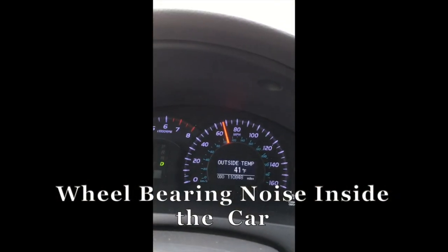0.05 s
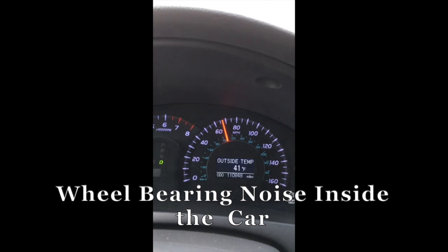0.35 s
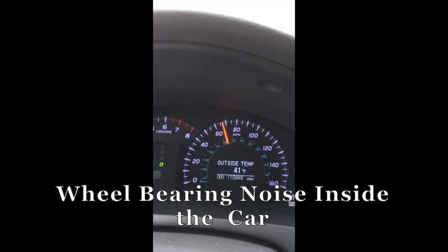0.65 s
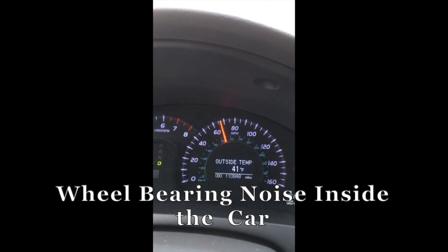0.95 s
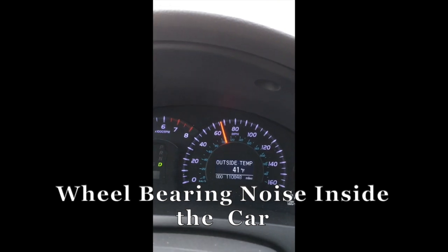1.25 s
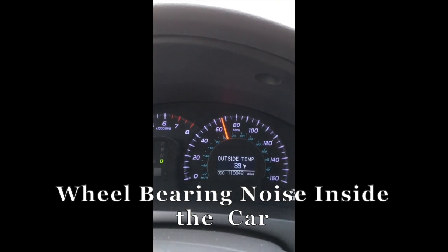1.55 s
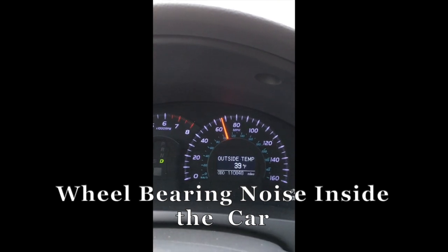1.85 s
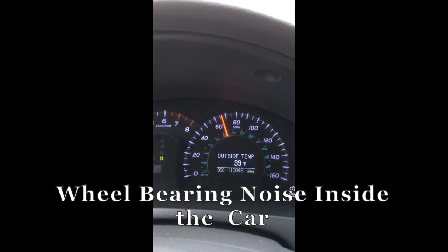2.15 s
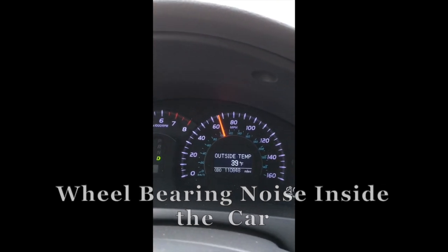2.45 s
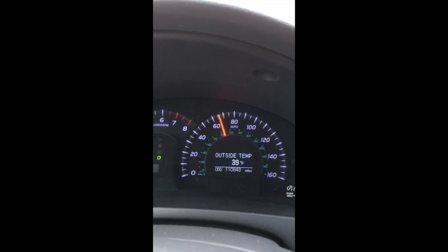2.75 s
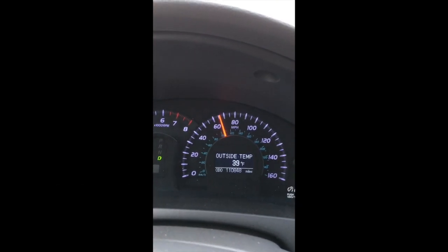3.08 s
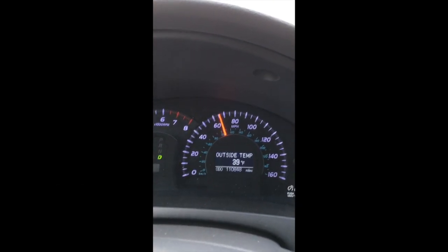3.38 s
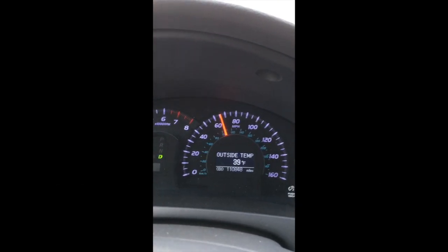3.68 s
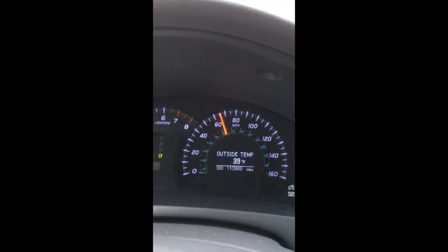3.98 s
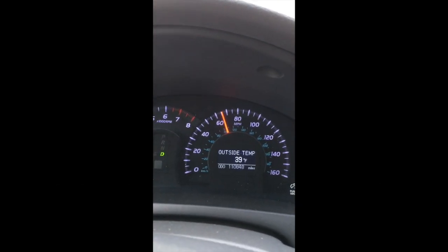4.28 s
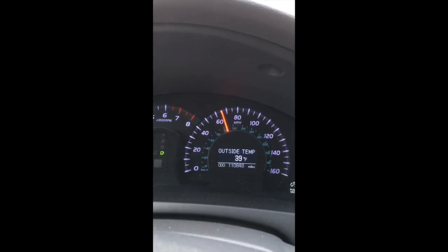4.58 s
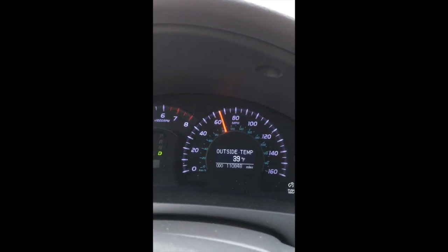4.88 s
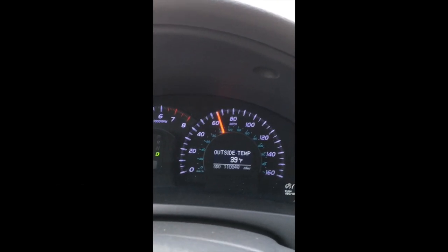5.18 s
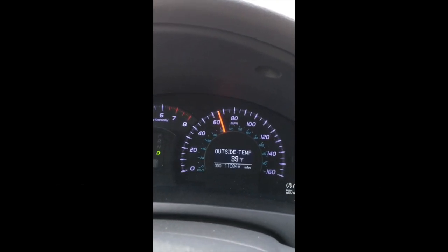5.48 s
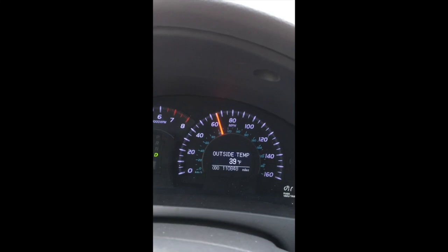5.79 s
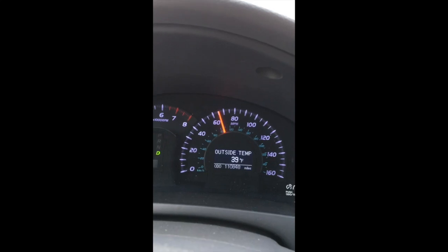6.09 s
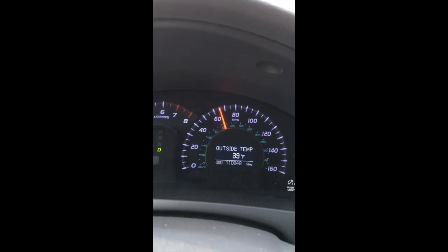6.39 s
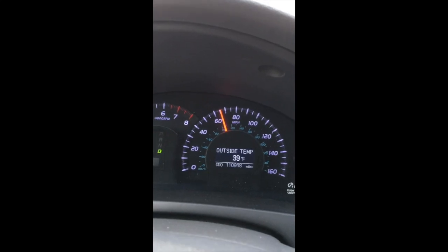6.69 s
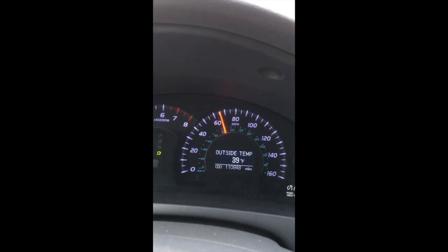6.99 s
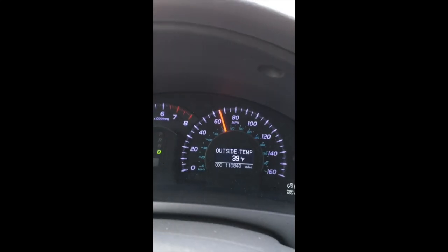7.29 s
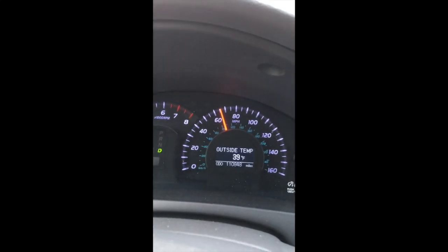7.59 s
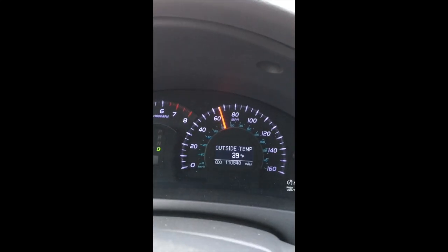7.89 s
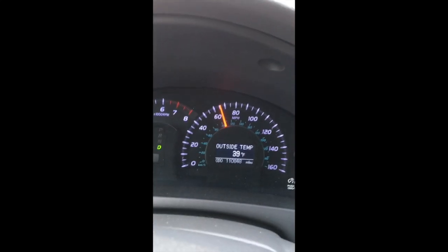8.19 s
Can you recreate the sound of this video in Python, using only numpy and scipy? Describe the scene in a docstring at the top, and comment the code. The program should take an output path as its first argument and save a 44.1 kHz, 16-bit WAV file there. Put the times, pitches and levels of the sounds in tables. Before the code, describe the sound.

A worn wheel bearing drones inside a fast-moving car over road rumble and tyre roar, with spells of buzzing dashboard trim.

```python
"""Highway drive on a worn wheel bearing

Inside the car, the wheels drone on multiples of their turning rate; the pitted bearing and the engine beat
against that drone and its deep boom. The road rumbles and roars through the body, swelling on bumps. Loose
dashboard trim buzzes in spells, once per wheel turn, with knocks, snaps and shivers; small bright ticks sound
now and then."""
import sys
import numpy as np
from scipy import signal
from scipy.fft import rfft, irfft, next_fast_len
from scipy.io import wavfile
from scipy.ndimage import uniform_filter1d

SR = 44100
rng = np.random.default_rng(int(sys.argv[2]) if len(sys.argv) > 2 else 0)


def inscribe(sig):
    """Save sig as 16-bit PCM at rate SR to the path in sys.argv[1].

    A 1-D sig is mono; a 2-D sig holds one channel per row.
    Samples are clipped to [-1, 1] before scaling.
    """
    pcm = np.round(np.clip(np.atleast_2d(sig).T, -1, 1) * 32767)
    wavfile.write(sys.argv[1], SR, pcm.astype(np.int16))


N = 372424

BALL_PASSES_PER_TURN = 8.13
# The ring of the loose trim. Each row: pitch in Hz, width in Hz, level in dB.
TRIM_RING = [(900, 57, 9), (1370, 150, -2), (2295, 440, 17), (3020, 410, -0.5), (4000, 190, 2),
             (4760, 420, 0), (5280, 360, 2), (6130, 540, 2.5), (6550, 330, 1), (7050, 800, -1),
             (8240, 400, -5), (9900, 400, -9), (12500, 4000, -18.5)]


def from_db(db):
    """Decibels to gain."""
    return 10 ** (np.asarray(db) / 20)


def rms_one(x):
    """Scale to unit rms."""
    return x / np.sqrt(np.mean(x ** 2) + 1e-20)


def in_time(rows):
    """A curve through (seconds, value) points, at every sample."""
    return np.interp(np.arange(N) / SR, *np.transpose(rows))


def drift(rate_hz):
    """Smooth random wandering with a spread of 1."""
    step = 40  # samples between control points
    pole = np.exp(-2 * np.pi * rate_hz * step / SR)
    white = rng.standard_normal(N // step + 2002)
    slow = signal.lfilter([1], [1, -2 * pole, pole * pole], white)[2000:]
    return np.interp(np.arange(N) / step, np.arange(len(slow)), rms_one(slow))


def swell(crest_s, length_s):
    """A smooth rise and fall of height 1."""
    return np.cos(np.pi * np.clip((np.arange(N) / SR - crest_s) / length_s, -.5, .5)) ** 2


def tone(cycles):
    """A sine of rms 1 that follows a running count of cycles."""
    return np.sqrt(2) * np.sin(2 * np.pi * (cycles + rng.random()))


def noise(spectrum):
    """Noise of rms 1, coloured by (Hz, dB) points and falling away beyond them."""
    size = next_fast_len(N)
    hz, db = np.transpose(spectrum)
    bins_hz = np.maximum(np.arange(size // 2 + 1) * SR / size, 1)
    skirts = np.minimum(1, np.minimum(bins_hz / hz[0], hz[-1] / bins_hz)) ** 4
    gain = from_db(np.interp(np.log(bins_hz), np.log(hz), db)) * skirts
    return rms_one(irfft(rfft(rng.standard_normal(size)) * gain, size)[:N])


def evened(x, window_s):
    """Take the chance swells out of a noise."""
    return x / np.sqrt(uniform_filter1d(x ** 2, int(window_s * SR)))


def resonate(x, modes):
    """Parallel resonances with alternating signs."""
    out = 0
    for k, (hz, width, db) in enumerate(modes):
        radius = np.exp(-np.pi * width / SR)
        poles = [1, -2 * radius * np.cos(2 * np.pi * hz / SR), radius ** 2]
        gain = (-1) ** k * from_db(db) * (1 - radius ** 2) / 2
        out = out + gain * signal.lfilter([1, 0, -1], poles, x + 1e-18)
    return out


def cabin(x, echo_db):
    """Glass and dashboard return a few early reflections that ripple the spectrum."""
    out = x.copy()
    for delay_s, sign in zip(rng.uniform(.0011, .016, size=8), rng.choice([-1, 1], size=8)):
        lag = int(delay_s * SR)
        out[lag:] += sign * from_db(echo_db) * x[:-lag]
    return out


def wheel_drone(speed, turns, waver_db, slip_turns):
    """The same unevenness comes round on every turn; changing load makes each partial waver."""
    # The worn wheel's partials. Each row: multiple of the turning rate, level in dB.
    partials = [(3, -40.1), (9, -32.6), (10, -47.1), (14, -48.1), (15, -40.5), (16, -40.4), (17, -39.8),
                (19, -55.9), (22, -58.9), (23, -47.9), (25, -44.5), (26, -53.5), (30, -59.4), (31, -53.9),
                (33, -49.7), (38, -61.4), (39, -51.9), (41, -65.7), (45, -62.8), (46, -60.9), (47, -57.4),
                (48, -62.9), (49, -55.7), (65, -64.6), (71, -62.0)]
    # Partials that swell or fade with speed. Each row: multiple, dB gained per extra turn a second.
    slopes = [(15, 11), (17, -15), (23, -8), (33, -6), (39, -7), (47, -38), (49, -20)]
    slope_of, faster = dict(slopes), speed - speed.mean()
    slipped = turns + slip_turns * drift(2.8)
    return sum(from_db(db + slope_of.get(k, 0) * faster + waver_db * drift(2)) * tone(k * slipped)
               for k, db in partials)


def pitted_bearing(turns, waver_db, slip_turns):
    """Balls roll over a pit that turns through the loaded zone, making sidebands one turn apart."""
    # The pit's tones. Each row: multiple of the ball-pass rate, offset in cycles per turn, level in dB.
    pit_tones = [(2, 0, -50.9), (2, 1, -43.5), (3, -1, -54.7), (3, 1, -59.7), (4, 1, -62.4), (5, -1, -60.1),
                 (5, 0, -64.9), (5, 1, -59.9), (5, 2, -66.5), (6, -1, -61.4), (6, 1, -66.4)]
    passes = BALL_PASSES_PER_TURN * (turns + slip_turns * drift(.84))
    return sum(from_db(db + waver_db * drift(3.9)) * tone(k * passes + side * turns)
               for k, side, db in pit_tones)


def bearing_growl(turns, top_db, fall_db_per_octave):
    """Pairs of sidebands around higher multiples of the ball-pass rate, weaker by the octave."""
    growl = 0
    for k in range(7, 18):
        db = top_db - fall_db_per_octave * np.log2(k / 7)
        for side in (-1, 1):
            growl += from_db(db + 1.5 * drift(2)) * tone((k * BALL_PASSES_PER_TURN + side) * turns)
    return growl


def deep_boom(speed, turns, top_db, waver_db):
    """Seven cycles per wheel turn, strongest at one road speed and following the speed a little late."""
    peak_speed, width, lag_s = 14.125, .06, .25  # turns a second; 1 dB weaker a width away
    earlier_speed = np.interp(np.arange(N) - lag_s * SR, np.arange(N), speed)
    db = top_db - ((earlier_speed - peak_speed) / width) ** 2
    return from_db(db - waver_db * drift(2.2)) * tone(7 * turns)


def engine(turns, firings_per_turn):
    """The firings drone just above the boom and beat with it where the two overlap."""
    # It comes through as the car slows and picks up. Each row: time in seconds, level in dB.
    fader = [(0, -56), (2.4, -47.5), (3.3, -32.5), (5.5, -29.5), (6.4, -37.5), (8.44, -47)]
    return from_db(in_time(fader)) * tone(firings_per_turn * turns)


def body_rumble(shake_db, thud_db, tremble_db, panel_db, panel_follow):
    """Each bump swells the steady chassis shake and cabin thud; the panels follow in part."""
    # The bigger bumps. Each row: crest in seconds, length in seconds, shake in dB, thud in dB.
    bumps = [(0.01, .2, -37, -24), (0.803, 0.2, -40, -20.5), (1.738, 0.27, -29, -29),
             (1.868, 0.13, -32, -22), (2.37, .4, -32, -27.5), (3.025, 0.32, -26, -21.5),
             (3.258, 0.36, -37, -22.5), (3.877, 0.41, -43, -21), (4.548, 0.66, -38, -26),
             (5.01, 0.2, -29, -17), (5.375, 0.17, -27, -28), (5.676, 0.37, -35, -18.5),
             (6.157, 0.15, -36, -19), (7.182, 0.18, -28, -22.5), (7.651, 0.16, -21, -18.5),
             (8.082, 0.39, -34, -21)]
    # Colours of chassis, cabin and panels. Each row: frequency in Hz, relative level in dB.
    shake_colour = [(20, -22), (28, -9), (42, 0), (52, -1), (62, -12)]
    thud_colour = [(48, -14), (58, -2), (68, 0), (83, 0), (98, -7), (118, -14)]
    panel_colour = [(100, -7), (118, -1), (145, -1), (175, 0), (203, -7), (240, -13), (275, -12),
                    (400, -32)]
    shake_gain, thud_gain = from_db(shake_db), from_db(thud_db + tremble_db * drift(4))
    for crest_s, length_s, bump_shake_db, bump_thud_db in bumps:
        push = swell(crest_s, length_s)
        shake_gain = np.hypot(shake_gain, from_db(bump_shake_db) * push)
        thud_gain = np.hypot(thud_gain, from_db(bump_thud_db) * push)
    shake = shake_gain * evened(noise(shake_colour), window_s=.11)
    thud = thud_gain * evened(noise(thud_colour), window_s=.099)
    panel_gain = from_db(panel_db) * (thud_gain / thud_gain.mean()) ** panel_follow
    return shake + thud + panel_gain * noise(panel_colour)


def tyre_roar(turns, roar_db, ring_db, throb_db):
    """The tyres roar on the road, ring the panels and throb twice per turn."""
    # The changing road surface. Each row: time in seconds, level in dB.
    surface = [(0, -42.5), (.7, -44.5), (2.5, -42), (5, -43), (8.44, -44)]
    # The roar's colour. Each row: frequency in Hz, relative level in dB.
    colour = [(170, -64), (300, -59.5), (390, -59), (500, -62.5), (590, -58), (670, -60.5), (740, -64.5),
              (850, -59.5), (1020, -60.5), (1150, -64.5), (1800, -70), (2900, -76.5), (3700, -85),
              (5000, -108)]
    # The ring of panels and glass. Each row: pitch in Hz, width in Hz, level in dB.
    panel_ring = [(680, 18, 4), (845, 45, 0), (990, 18, 0), (1037, 18, 4), (1355, 40, -3), (1470, 80, -8),
                  (1615, 30, -5), (1900, 40, -8), (2250, 35, -11), (2560, 60, -12), (3050, 100, -18),
                  (3250, 50, -18)]
    ringing = from_db(ring_db) * rms_one(resonate(rng.standard_normal(N), panel_ring))
    gain = from_db(in_time(surface) + throb_db * tone(2 * turns))
    return gain * (from_db(roar_db) * noise(colour) + ringing)


def air_hiss(level_db, waver_db):
    """Air hisses faintly, wavering a little."""
    # The hiss's colour. Each row: frequency in Hz, relative level in dB.
    colour = [(2500, -5.5), (4300, 3.5), (4900, -1.5), (5400, 2.5), (6800, -3), (7700, -5.5), (8800, -3.5),
              (10000, -5.5), (10400, -9), (11200, -5), (16000, -7)]
    return from_db(level_db + waver_db * drift(2.1)) * noise(colour)


def chatter(events, modes, gain_db, contacts_per_s, rise_s, decay_s, scatter_db=1.5):
    """Each (seconds, dB) event is a dying flurry of tiny contacts that rings the plastic its own way."""
    out, age = np.zeros(N + SR), np.arange(SR // 6) / SR
    for start_s, db in events:
        force = from_db(db + gain_db) * (1 - np.exp(-age / rise_s)) * np.exp(-age / decay_s)
        contacts = (rng.random(len(age)) < contacts_per_s / SR) * rng.standard_normal(len(age))
        struck = [(hz, width, mode_db + rng.normal(0, scatter_db)) for hz, width, mode_db in modes]
        at = int(start_s * SR)
        out[at:at + len(age)] += resonate(force * contacts, struck) / np.std(resonate(contacts, struck))
    return out[:N]


def trim_buzz(speed, uneven_db):
    """During a spell, the loose trim is shaken once per wheel turn."""
    # Each row: start in seconds, number of buzzes, first and last level in dB, mid-spell swell in dB.
    spells = [(1.175, 9, -49, -51, 5), (2.234, 3, -51, -41, -1.5), (2.72, 5, -44, -44, -1),
              (3.225, 3, -47.5, -45, 3), (3.584, 2, -47, -52, 0), (4.08, 1, -46.5, -46.5, 0),
              (4.759, 2, -53, -44, 0), (5.082, 3, -45, -47, 1), (6.643, 6, -53, -51.5, 3.5),
              (7.49, 2, -48, -44, 0)]
    buzzes = []
    for start_s, count, first_db, last_db, swell_db in spells:
        along = np.linspace(0, 1, count)
        times = start_s + np.arange(count) / speed[int(start_s * SR)]
        arch_db = first_db + (last_db - first_db) * along + swell_db * np.sin(np.pi * along)
        buzzes += zip(times, arch_db + uneven_db * rng.standard_normal(count))
    return chatter(buzzes, TRIM_RING, gain_db=2, contacts_per_s=3000,
                   rise_s=.0016, decay_s=.011, scatter_db=3)


def dashboard_knocks():
    """Some buzzes come with a lower, hollow knock of the dashboard."""
    # Each row: start in seconds, level in dB.
    knocks = [(1.246, -44), (1.316, -42), (1.744, -43.5), (2.376, -42), (2.941, -36), (3.007, -44),
              (3.298, -40), (6.645, -44), (7.562, -38)]
    # The dashboard's ring. Each row: pitch in Hz, width in Hz, level in dB.
    ring = [(600, 120, 9), (860, 90, 13), (1350, 300, 3), (2250, 400, -1), (2560, 250, -2),
            (3150, 300, -10)]
    return chatter(knocks, ring, gain_db=6, contacts_per_s=8000, rise_s=.0035, decay_s=.021)


def trim_snaps(tilt_db_per_octave):
    """The trim snaps against its seat; the short, hard contact favours its high modes."""
    # Each row: start in seconds, level in dB.
    snaps = [(1.5295, -43), (2.9407, -40.5), (3.381, -43), (3.5866, -42), (5.068, -46), (5.623, -44),
             (6.6468, -36.5), (6.9235, -37.5)]
    ring = [(hz, width, db + tilt_db_per_octave * np.log2(hz / 1000)) for hz, width, db in TRIM_RING]
    return chatter(snaps, ring, gain_db=-.5, contacts_per_s=3000, rise_s=.001, decay_s=.0065)


def trim_shiver(contacts_per_s, flutter_db):
    """On rough stretches the trim shivers in a faint, fluttering patter of light contacts."""
    # Each row: crest in seconds, length in seconds, level in dB.
    shivers = [(2.48, .4, -57.5), (3.05, 0.76, -60), (5.0, 0.6, -57.5)]
    gain = sum(from_db(db) * swell(crest_s, length_s) for crest_s, length_s, db in shivers)
    contacts = (rng.random(N) < contacts_per_s / SR) * rng.standard_normal(N)
    return gain * from_db(flutter_db * drift(25)) * rms_one(resonate(contacts, TRIM_RING))


def bright_ticks():
    """Brief flurries of contacts sound as small, bright ticks."""
    # Each row: start in seconds, level in dB.
    ticks = [(4.11, -55), (4.9467, -57), (4.9741, -54), (5.6245, -58), (7.146, -54), (8.0621, -57.5),
             (8.095, -60)]
    # Their ring. Each row: pitch in Hz, width in Hz, level in dB.
    ring = [(4500, 350, 5), (5900, 1100, 2), (9000, 1200, -1.5), (12200, 2000, -4.5), (15100, 900, 2.5)]
    return chatter(ticks, ring, gain_db=-1, contacts_per_s=1400, rise_s=.0012, decay_s=.013)


def scene():
    """The mono cabin mix; everything that turns is geared to the road speed."""
    # The car eases off, then picks up. Each row: time in seconds, wheel turns a second.
    road_speed = [(0, 14.19), (1, 14.125), (2, 14.04), (3, 13.93), (3.6, 13.88), (4.5, 13.855), (5, 13.87),
                  (5.6, 13.94), (6.3, 14.04), (7.4, 14.08), (8.44, 14.095)]
    speed = in_time(road_speed)
    turns = np.cumsum(speed) / SR
    drone = wheel_drone(speed, turns, waver_db=1, slip_turns=.0012)
    drone += pitted_bearing(turns, waver_db=1.2, slip_turns=.001)
    drone += bearing_growl(turns, top_db=-62.5, fall_db_per_octave=6)
    lows = deep_boom(speed, turns, top_db=-21, waver_db=.17) + engine(turns, firings_per_turn=7.12)
    lows += body_rumble(shake_db=-37.5, thud_db=-28.5, tremble_db=.4, panel_db=-35.5, panel_follow=.17)
    roar = tyre_roar(turns, roar_db=1.5, ring_db=-6.5, throb_db=.47)
    air = cabin(air_hiss(level_db=-67.5, waver_db=.5), echo_db=-23)
    rattles = trim_buzz(speed, uneven_db=1) + trim_snaps(tilt_db_per_octave=3) + dashboard_knocks()
    rattles += bright_ticks() + trim_shiver(contacts_per_s=1300, flutter_db=2)
    return (from_db(.18) * drone + lows + roar + air + cabin(rattles, echo_db=-19))[None]


def record(dry):
    """Soft 4 ms ends and a steep cut above 15.8 kHz."""
    edge = np.minimum(1, np.minimum(np.arange(N), np.arange(N)[::-1]) / (.004 * SR))
    high_cut = signal.ellip(10, .1, 90, 15800, fs=SR, output="sos")
    return signal.sosfilt(high_cut, dry * np.sin(edge * np.pi / 2) ** 2)


dry = scene()
out = record(dry)
inscribe(out)
```